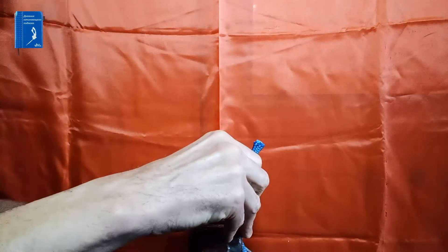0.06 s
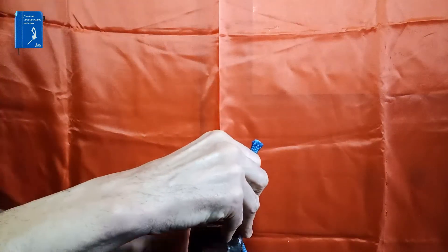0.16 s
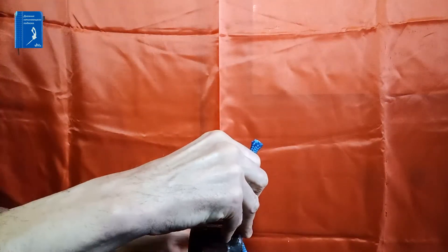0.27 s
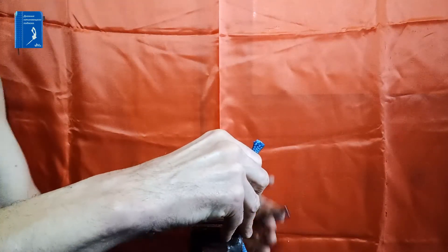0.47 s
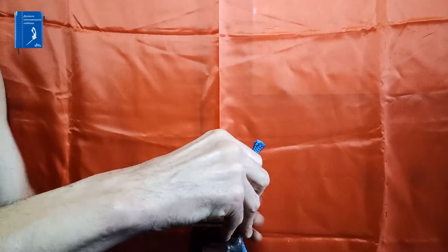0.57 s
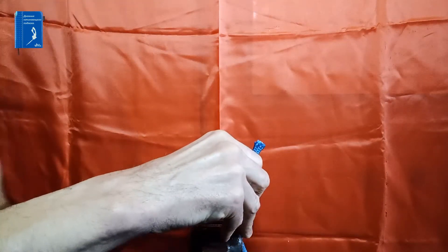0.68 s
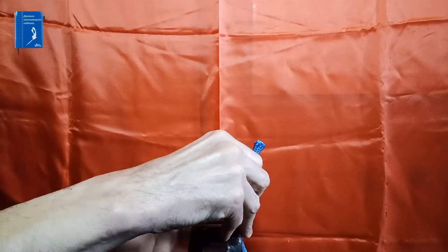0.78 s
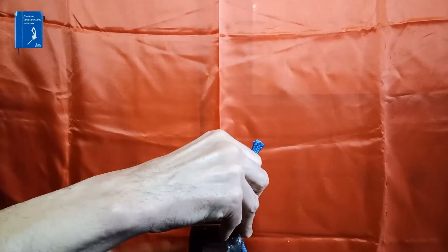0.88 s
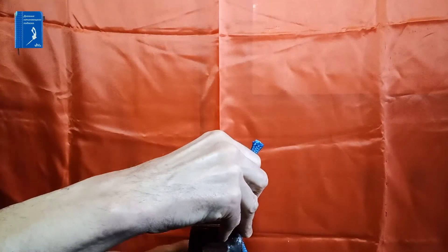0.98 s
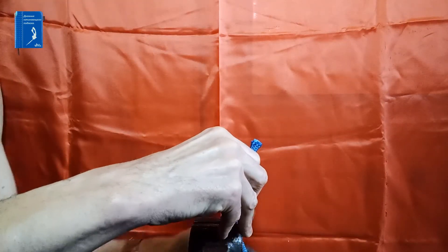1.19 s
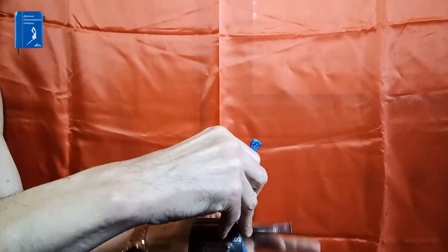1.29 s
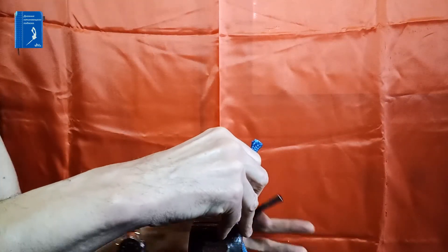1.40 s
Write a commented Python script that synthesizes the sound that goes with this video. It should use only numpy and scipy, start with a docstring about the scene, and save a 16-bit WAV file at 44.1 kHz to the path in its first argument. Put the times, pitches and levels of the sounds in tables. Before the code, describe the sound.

Metal vise handle knocks lightly, gives one loud sharp clack with a bounce, then a smaller clatter

```python
"""A hand turns the sliding handle of a small steel bench vise close to a phone in a quiet small room.
Over room hush, faint thumps and rubbing (dense ticks ringing the parts), the handle rattles lightly,
slaps hard once at 0.23 s and bounces, clatters again at 0.43 s, then the screw rubs on to the end.
Knocks ring decaying sines of body and handle; jolts add chattering noise and a boom in the bench.
The loud slap overloads the phone."""
import sys
import numpy as np
from scipy import signal
from scipy.fft import rfft, irfft
from scipy.io import wavfile
from scipy.ndimage import uniform_filter1d

SR = 44100
rng = np.random.default_rng(int(sys.argv[2]) if len(sys.argv) > 2 else 0)


def inscribe(sig):
    """Save sig as 16-bit PCM at rate SR to the path in sys.argv[1].

    A 1-D sig is mono; a 2-D sig holds one channel per row.
    Samples are clipped to [-1, 1] before scaling.
    """
    pcm = np.round(np.clip(np.atleast_2d(sig).T, -1, 1) * 32767)
    wavfile.write(sys.argv[1], SR, pcm.astype(np.int16))


def field_ratio(decibels):
    """Amplitude ratio for a level in dB (20 dB per decade); scalars and array-likes work."""
    return 10 ** (np.asarray(decibels, dtype=float) / 20)


N = 63945

# Modes of the vise body: freq_hz, rel_level_db, t60_s
BODY_MODES = [(760, -21, 0.013), (900, 0.5, 0.021), (1065.6, -5.5, 0.063), (1150, -0.5, 0.029),
              (1300, -7, .04), (1481, -8, 0.024), (1627, -5.5, .05), (1826, -1.5, 0.051),
              (1872.6, 0, 0.036), (2164.5, -4.5, 0.039), (2384, -8, .04), (2700, -5.5, 0.025)]
# Modes of the sliding handle: freq_hz, rel_level_db, t60_s
HANDLE_MODES = [(4850, -23, 0.018), (5014, -9, 0.016), (5129, 0, 0.014), (5259, -7.5, 0.011),
                (5280, -30.5, 0.014)]
# Modes of the bench: freq_hz, rel_level_db, t60_s
BENCH_MODES = [(220.6, -4.5, 0.17), (272.6, -9.5, 0.22), (309.75, 0.5, 0.15), (382.8, -4.5, .12),
               (450, 2, 0.055)]
MODE_SCATTER_DB = 1.17  # standard deviation per mode and hit


def unit(x):
    """Scales to an rms of 1."""
    return x / np.sqrt(np.mean(x ** 2))


def unit_energy(x):
    """Scales to an energy of 1, as for an impulse response."""
    return x / np.sqrt(np.sum(x ** 2))


def band(x, lo_hz, hi_hz):
    """Butterworth band-pass."""
    return signal.sosfilt(signal.butter(2, [lo_hz, hi_hz], "band", fs=SR, output="sos"), x)


def walk(rate_hz):
    """Smooth random drift about 0: held random values, box-smoothed twice."""
    hold = int(SR / rate_hz)
    steps = np.repeat(rng.standard_normal(N // hold + 1), hold)
    return 0.43 * uniform_filter1d(uniform_filter1d(steps, hold), hold)[:N]


def ring(modes, extra_db, rise_ms):
    """Decaying sines of one part, swelling while the contact lasts."""
    t = np.arange(int(SR / 4)) / SR
    hz, db, t60_s = np.array(modes, float).T[:, :, None]
    sign = (-1) ** np.arange(len(modes))[:, None]
    level = sign * field_ratio(db + extra_db[:, None])
    tones = level * np.sin(2 * np.pi * hz * t) * 1000 ** (-t / t60_s)
    swell = 1 - np.exp(-(t * 1000 / max(rise_ms, 0.05)) ** 2)
    return tones.sum(axis=0) * swell


def add_at(out, start_s, sound):
    """Mixes a sound into out from start_s on."""
    start = int(start_s * SR)
    out[start:start + len(sound)] += sound


def hush():
    """Quiet room air in third-octave noise bands that flicker alone, over a fitful low rumble."""
    # Spectrum of the air: freq_hz, rel_level_db_per_hz
    air_spectrum = [(12, -48), (20, -18), (82, -5), (163, -11.5), (180, -28), (333, -2.5), (441, -7.5),
                    (476, -5), (555, -17), (631, -2.5), (794, -15.5), (1230, -9.5), (2150, -24.5),
                    (2380, -21), (3870, -27.5), (7530, -32.5), (9000, -52), (11700, -91), (19800, -120)]
    air_db, rumble_db, rumble_hz = -66, -68, 90.1
    table_hz, table_db = np.transpose(air_spectrum)
    air = 0
    for hz in 28 * 2 ** np.arange(0, 8.4, 1 / 3):
        density_db = np.interp(np.log(hz), np.log(table_hz), table_db)
        db = density_db + 10 * np.log10(hz) + 2.0 * walk(13)  # band power grows with bandwidth
        air = air + field_ratio(db) * unit(band(rng.standard_normal(N), hz * 0.89, hz * 1.145))
    rumble = unit(band(rng.standard_normal(N), rumble_hz * 0.82, rumble_hz * 3.6))
    return field_ratio(air_db) * unit(air) + field_ratio(rumble_db + 2.7 * walk(14.37)) * rumble


def thumps():
    """Faint low bumps, as of hands shifting on the bench: sines under bell envelopes."""
    # Bumps: start_s, level_db, pitch_hz
    bumps = [(0.06, -53, 76.5), (0.143, -54.5, 112), (0.279, -57, 64.6), (0.391, -60.5, 114.7),
             (0.489, -64, 73.6), (0.559, -64, 111), (0.689, -56, 96.9), (0.747, -59.5, 110.2),
             (0.809, -60.5, 93.7), (0.904, -58.5, 89.6), (1.031, -53, 113), (1.18, -73, 61.9),
             (1.251, -63, 82.2), (1.387, -60.5, 102.2)]
    width_s = 0.018  # the bell also peaks this long after start_s
    t = np.arange(N) / SR
    out = np.zeros(N)
    for s, db, hz in bumps:
        bell = np.exp(-((t - s) / width_s - 1) ** 2)
        out += field_ratio(db) * bell * np.sin(2 * np.pi * hz * (t - s))
    return out


def rub():
    """The screw and the fingers slip in many tiny random ticks that ring each part."""
    # Rubbing: time_s, bench_db, low_body_db, high_body_db, handle_db, screw_db
    rub_levels = [(0.0, -52, -45.5, -77, -78, -87), (0.05, -54, -59, -70, -74.5, -69.5),
                  (0.1, -78, -56, -65.5, -76.5, -83.5), (0.14, -73, -49.5, -62, -63, -71),
                  (0.18, -58, -42.5, -48.5, -50.5, -84), (0.2, -62.5, -53.5, -60, -76, -66),
                  (0.23, -37, -41, -48.5, -60, -73), (0.33, -54.5, -76, -82.5, -59, -68.5),
                  (0.4, -73, -90.5, -81, -73.5, -83.5), (0.46, -55, -72, -74, -89, -67),
                  (0.54, -70.5, -66, -77, -97, -78), (0.62, -71.5, -64, -77, -83.5, -76),
                  (0.72, -66.5, -69, -67.5, -84, -71.5), (0.8, -72.5, -67.5, -72.5, -80.5, -77.5),
                  (0.88, -63, -63, -67, -89, -70.5), (0.95, -67, -66.5, -72.5, -84, -75.5),
                  (1.02, -72, -72, -75.5, -86, -71.5), (1.1, -71, -78, -82.5, -91.5, -92),
                  (1.2, -69, -72.5, -77.5, -90, -79), (1.45, -76.5, -69.5, -78, -89.5, -85)]
    # Modes of the screw: freq_hz, rel_level_db, t60_s
    screw_modes = [(2620, -4.5, 0.035), (2928, -6, 0.022), (4000, -4.5, .04), (4330, -3, .07),
                   (4580, -4.5, .05), (5700, -10.5, .03), (6600, -11, 0.021), (7280, -8, 0.026)]
    ticks_per_s, tick_spread_db, body_split_hz, rise_ms = 1200, 2, 1520, 0.56
    low_body = [m for m in BODY_MODES if m[0] < body_split_hz]
    high_body = [m for m in BODY_MODES if m[0] > body_split_hz]
    parts = (BENCH_MODES, low_body, high_body, HANDLE_MODES, screw_modes)
    time_s, *part_levels_db = np.transpose(rub_levels)
    t = np.arange(N) / SR
    out = np.zeros(N)
    for modes, level_db in zip(parts, part_levels_db):
        happens = rng.random(N) < ticks_per_s / SR
        size = field_ratio(tick_spread_db * rng.standard_normal(N))
        ticks = unit(happens * size * rng.choice([-1, 1], N))
        ticks = ticks * field_ratio(np.interp(t, time_s, level_db) + 2.5 * walk(29))
        tone = unit_energy(ring(modes, np.zeros(len(modes)), rise_ms))
        out += signal.fftconvolve(ticks, tone)[:N]
    return out


def jolts():
    """The harder blows shake loose parts into a dense chatter and boom in the bench."""
    # Jolts: start_s, chatter_db, length_s (before the fade), bench_db
    blows = [(0.0, -46.5, 0.004, -49), (0.155, -50.5, .004, -65.5), (0.17, -47.5, .005, -57),
             (0.188, -49.5, .008, -60), (0.209, -54, .008, -63), (0.219, -50, .004, -62),
             (0.231, -36, .004, -49), (0.2328, -20, 0.0094, -25.5), (0.245, -34.5, 0.043, -38),
             (0.4257, -36, 0.021, -46), (0.971, -58, .002, -63)]
    # Spectrum of the chatter: freq_hz, rel_level_db_per_hz
    chatter_spectrum = [(700, -5), (900, -3), (1200, 3.5), (1450, -0.5), (2200, 3), (2600, -8),
                        (3500, -5.5), (4300, -4), (4800, -2.5), (5500, -7), (6000, -15.5), (6400, -18.5),
                        (7000, -18), (7800, -19), (8500, -31.5)]
    chatter_rise_s, chatter_fade_s, bench_rise_ms = 0.0037, 0.0092, 4.4
    t = np.arange(N) / SR
    hz = np.arange(N // 2 + 1) * SR / N + 1  # +1 avoids log(0)
    table_hz, table_db = np.transpose(chatter_spectrum)
    colour = field_ratio(np.interp(np.log(hz), np.log(table_hz), table_db, left=-60))
    grains = rng.standard_normal(N) * field_ratio(4.5 * rng.standard_normal(N))  # spiky noise
    chatter = unit(irfft(rfft(grains) * colour, N))
    out = np.zeros(N + SR)
    for s, chatter_db, length_s, bench_db in blows:
        rise = np.clip((t - s) / chatter_rise_s, 0, 1)
        fade = np.exp(-np.clip(t - s - length_s, 0, 1) / chatter_fade_s)
        out[:N] += chatter * field_ratio(chatter_db) * rise * fade
        scatter_db = MODE_SCATTER_DB * rng.standard_normal(len(BENCH_MODES))
        add_at(out, s, ring(BENCH_MODES, bench_db + scatter_db, bench_rise_ms))
    return out[:N]


def knocks():
    """Each contact rings body and handle; where it lands favours body modes near one frequency."""
    # Contacts: start_s, body_db, favoured_hz, handle_db, rise_ms
    contacts = [(0.001, -31.5, 1114, -48.5, 0.333), (0.008, -39.5, 994, -53.5, 0.33),
                (0.075, -42.5, 1110, -64, 3.1), (0.096, -30.5, 1186, -80.5, 6),
                (0.1145, -18.5, 900, -64, 3.5), (0.133, -32.5, 1160, -59, 3.8),
                (0.158, -34.5, 1096, -36.5, 0.333), (0.172, -29.5, 1062, -35, 0.69),
                (0.188, -38.5, 1800, -39, 0.66), (0.205, -34, 1710, -49.5, 1.5),
                (0.221, -61, 1800, -49, 0.73), (0.2290, -20, 1100, -20.5, 0.4),
                (0.232, -11, 1050, 9.5, 1.1), (0.2382, -13, 1300, -17.5, 0.65), (0.241, -23, 1300, -20, .8),
                (0.248, -24, 1449, -23, 0.87), (0.253, -36, 1200, -21.5, 1), (0.255, -29.5, 1200, -12, 1.1),
                (0.265, -28.5, 1500, -21, 1), (0.271, -30, 1200, -26, 1.6),
                (0.424, -42.5, 1094, -64.5, 1.9), (0.4292, -23.5, 1085, -20.5, 1.94),
                (0.435, -29, 1010, -27.5, 1.45), (0.4415, -40, 1887, -21, 0.568),
                (0.4424, -22, 1150, -43.5, 1.2), (0.449, -35, 1600, -32.5, 0.73),
                (0.974, -48, 1700, -69, .6), (0.989, -61, 1605, -79, 3)]
    favour_db_per_oct2 = -40
    body_hz = np.array(BODY_MODES)[:, 0]
    out = np.zeros(N + SR)
    for s, body_db, favoured_hz, handle_db, rise_ms in contacts:
        favour_db = favour_db_per_oct2 * np.log2(body_hz / favoured_hz) ** 2
        body_scatter_db = MODE_SCATTER_DB * rng.standard_normal(len(BODY_MODES))
        handle_scatter_db = MODE_SCATTER_DB * rng.standard_normal(len(HANDLE_MODES))
        add_at(out, s, ring(BODY_MODES, body_db + favour_db + body_scatter_db, rise_ms))
        add_at(out, s, ring(HANDLE_MODES, handle_db + handle_scatter_db, rise_ms))
    return out[:N]


def room(x):
    """Echoes of a small room: noise that dies away at its own rate in each band."""
    # Echo bands: centre_hz, t60_s, rel_level_db
    echo_bands = [(324, 0.15, -16), (600, 0.47, -31.5), (1200, 0.18, -16.5), (2400, 0.18, -12),
                  (4930, 0.22, -12.5), (8250, 0.12, -14)]
    gap_s = 0.004  # silent this long, then fades in over as long again
    t = np.arange(int(SR * 0.6)) / SR
    onset = np.clip(t / gap_s - 1, 0, 1)
    tail = 0
    for hz, t60_s, db in echo_bands:
        noise = unit(band(rng.standard_normal(len(t)), hz * 0.64, hz * 1.4))
        tail = tail + field_ratio(db) * unit_energy(noise * 1000 ** (-t / t60_s) * onset) / 2
    return x + signal.fftconvolve(x, tail)[:N]


def scene():
    """Vise sounds with their echoes, over thumps and hush, as one channel."""
    vise = knocks() + jolts() + rub()
    return (room(vise) + thumps() + hush())[None]


def band_limit(x):
    """A steep low-pass at the top of the band."""
    return signal.sosfilt(signal.butter(12, 16270, fs=SR, output="sos"), x)


def record(dry):
    """The phone passes little above its top frequency, then clips the slap."""
    top_hz, ceiling = 8135, 0.95
    low_pass = signal.ellip(8, 0.5, 70, top_hz, fs=SR, output="sos")
    heard = signal.sosfilt(low_pass, dry)
    return band_limit(np.clip(heard, -ceiling, ceiling))


dry = scene()
out = record(dry)
inscribe(out)
```